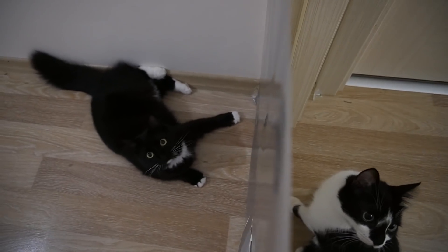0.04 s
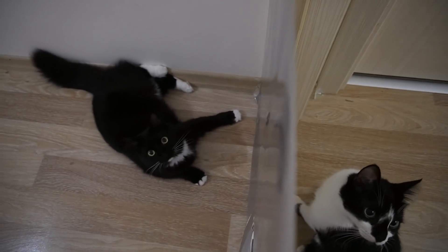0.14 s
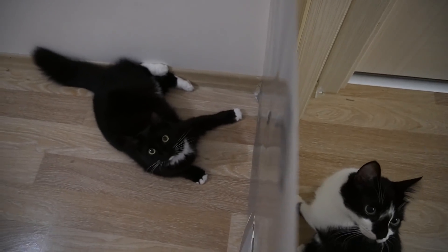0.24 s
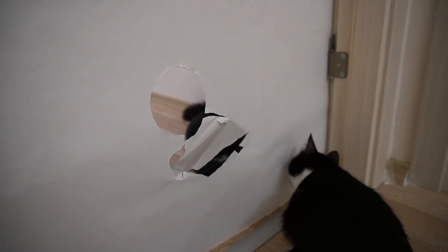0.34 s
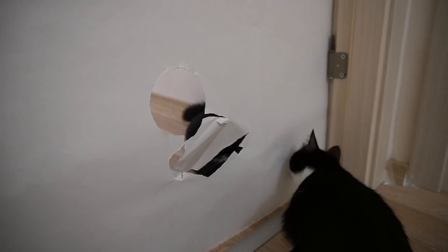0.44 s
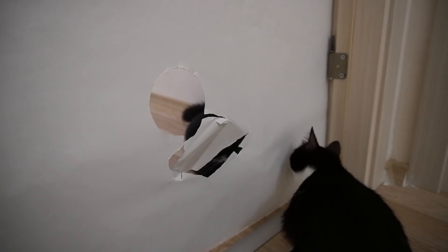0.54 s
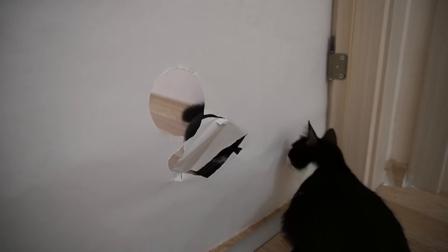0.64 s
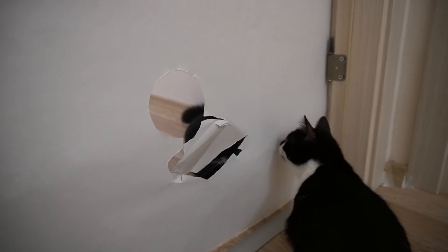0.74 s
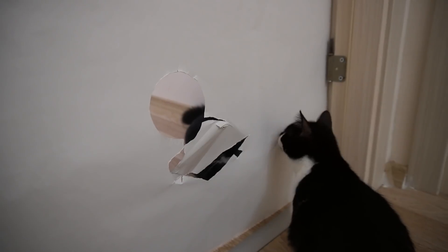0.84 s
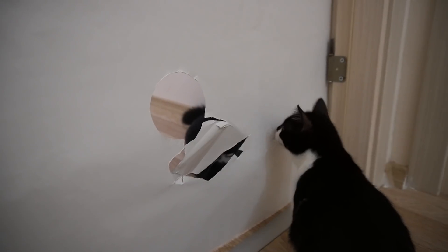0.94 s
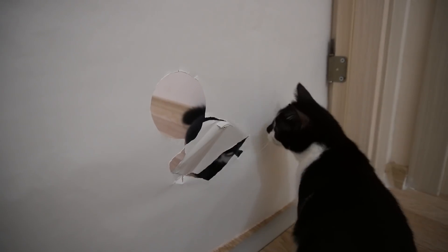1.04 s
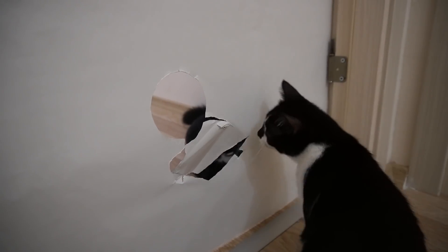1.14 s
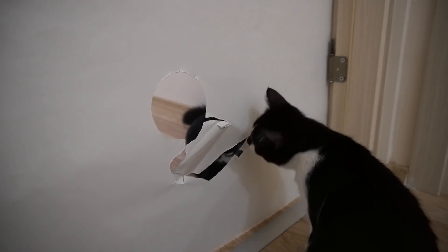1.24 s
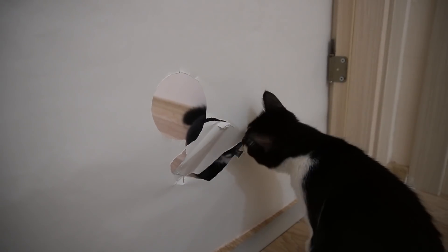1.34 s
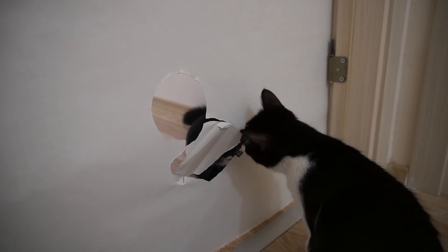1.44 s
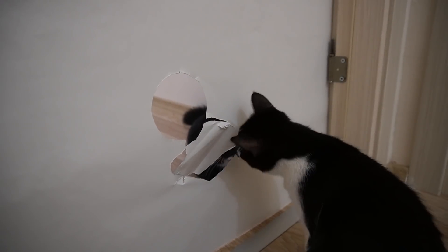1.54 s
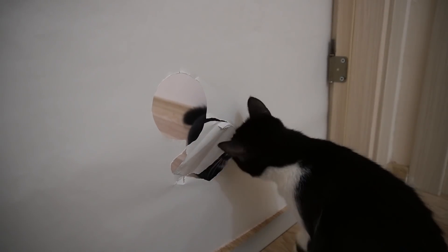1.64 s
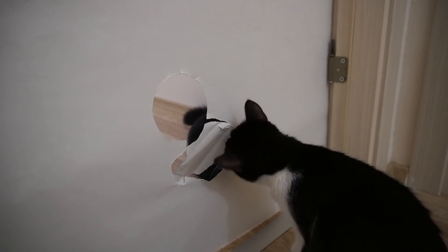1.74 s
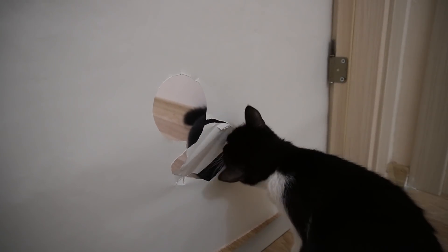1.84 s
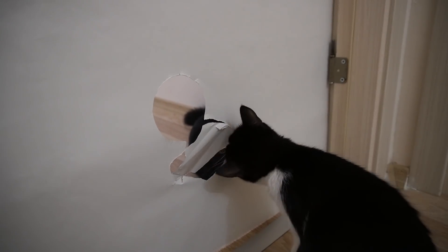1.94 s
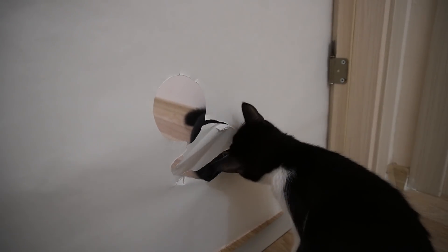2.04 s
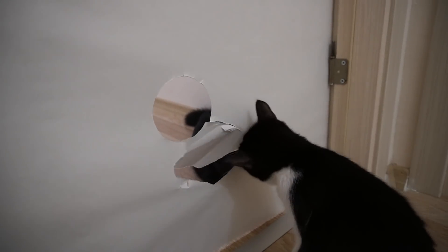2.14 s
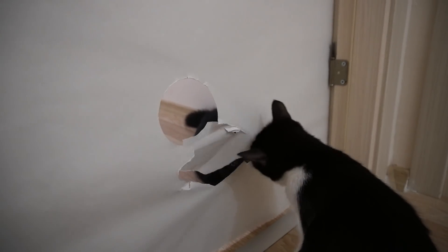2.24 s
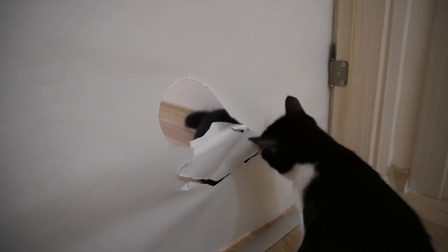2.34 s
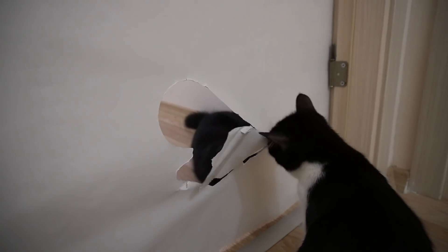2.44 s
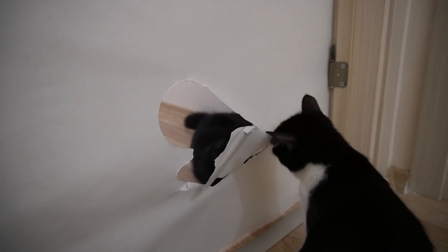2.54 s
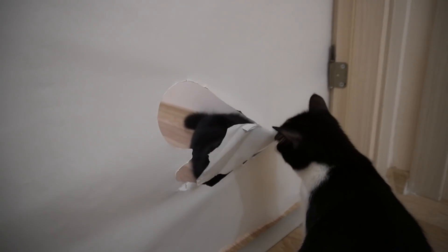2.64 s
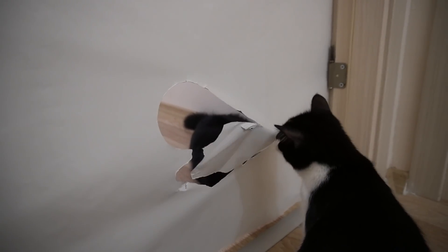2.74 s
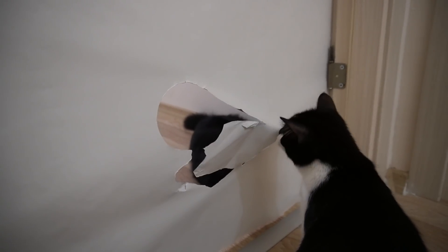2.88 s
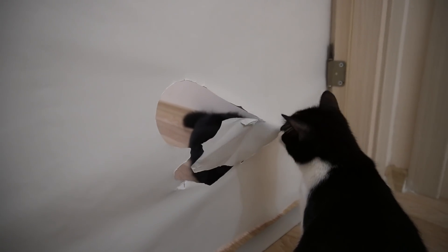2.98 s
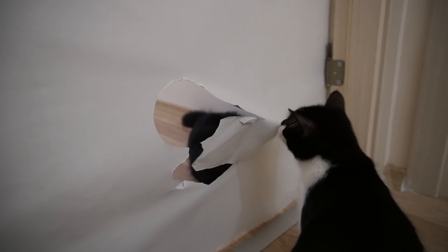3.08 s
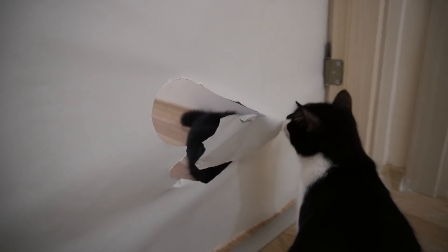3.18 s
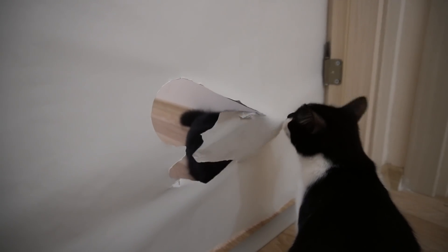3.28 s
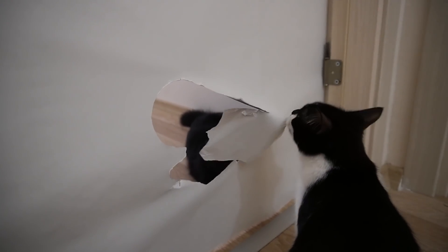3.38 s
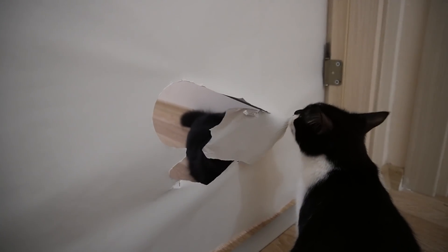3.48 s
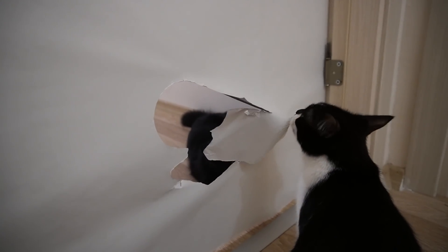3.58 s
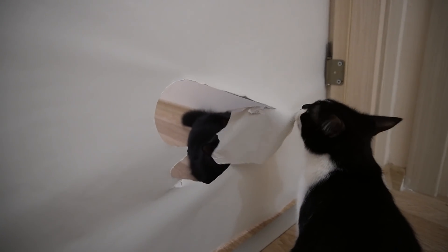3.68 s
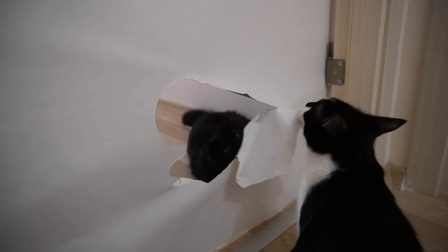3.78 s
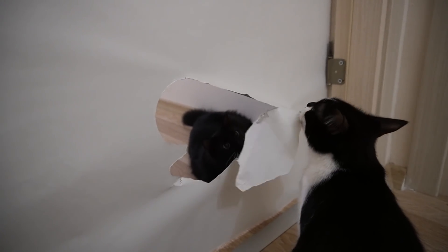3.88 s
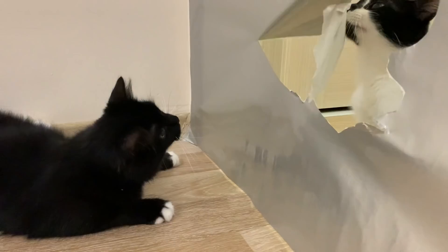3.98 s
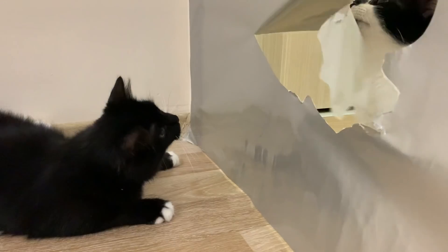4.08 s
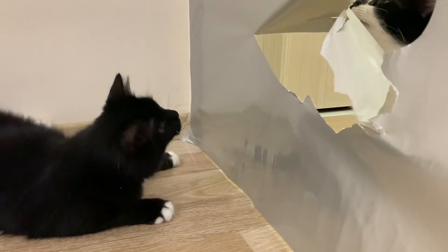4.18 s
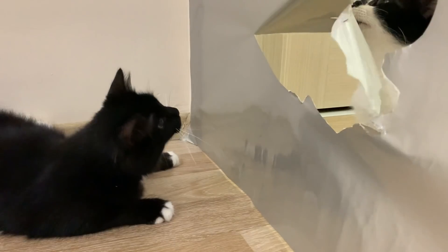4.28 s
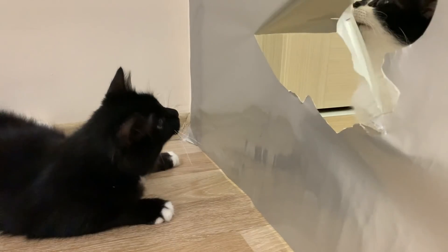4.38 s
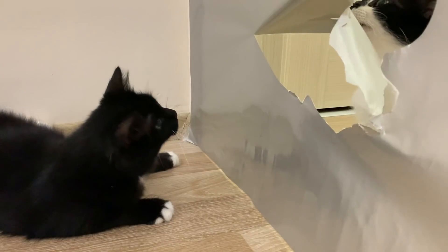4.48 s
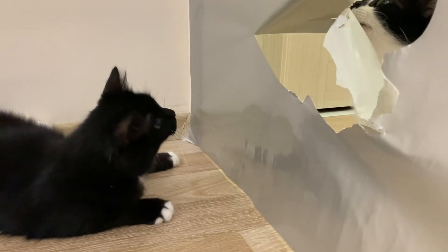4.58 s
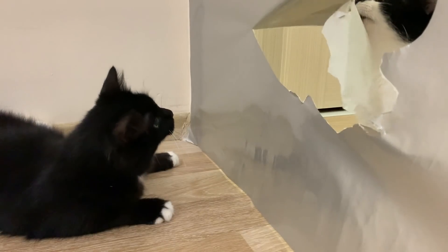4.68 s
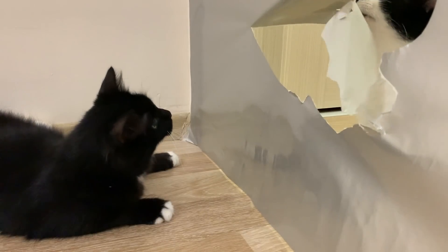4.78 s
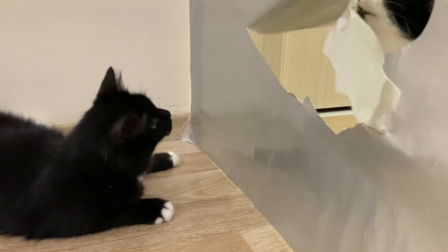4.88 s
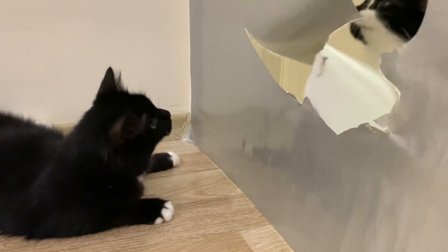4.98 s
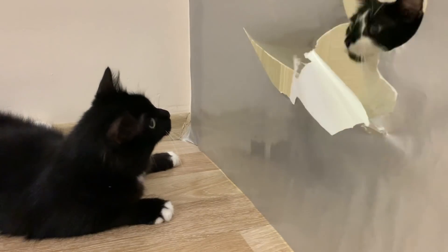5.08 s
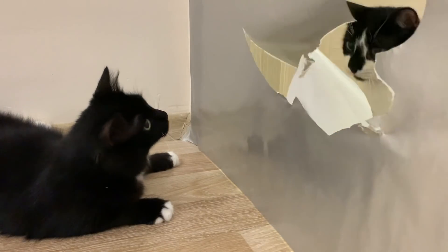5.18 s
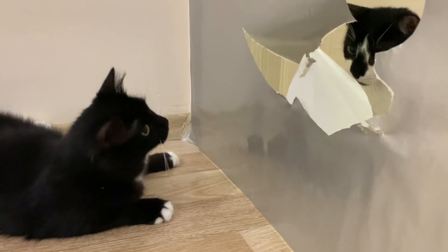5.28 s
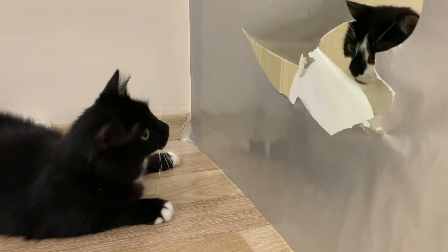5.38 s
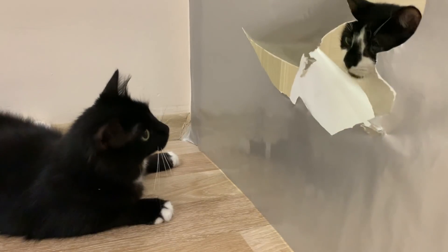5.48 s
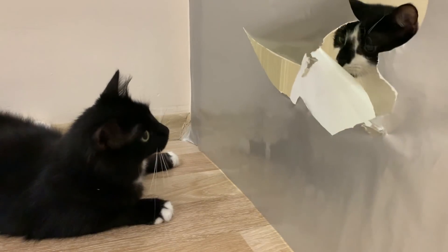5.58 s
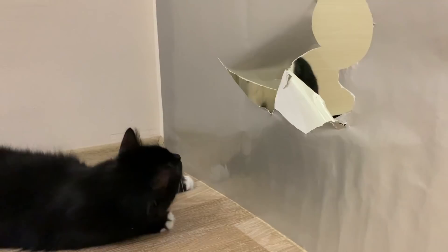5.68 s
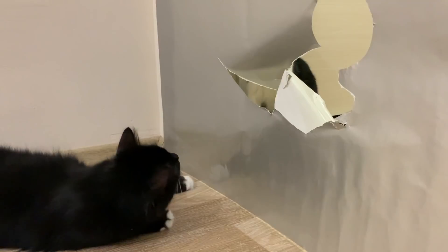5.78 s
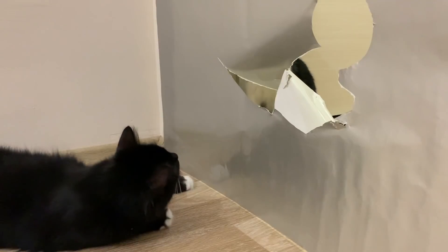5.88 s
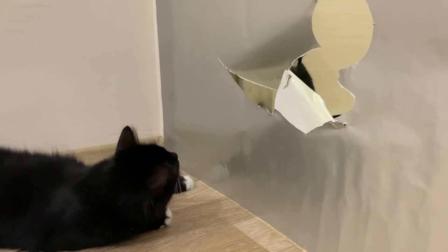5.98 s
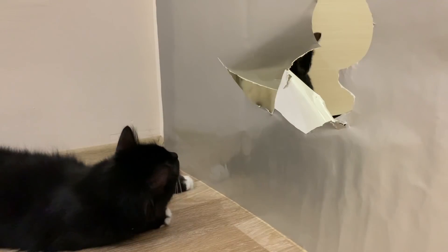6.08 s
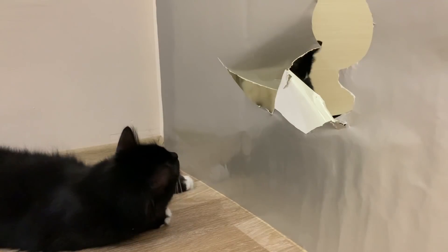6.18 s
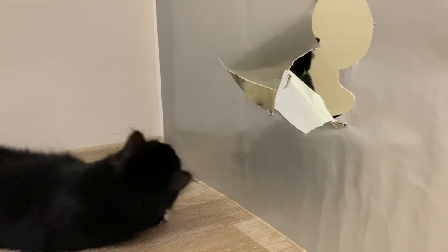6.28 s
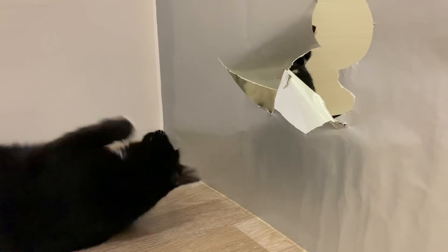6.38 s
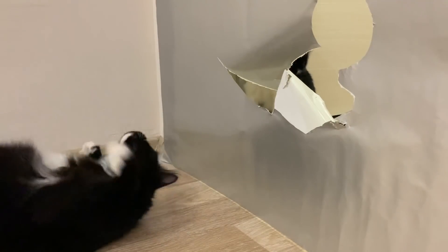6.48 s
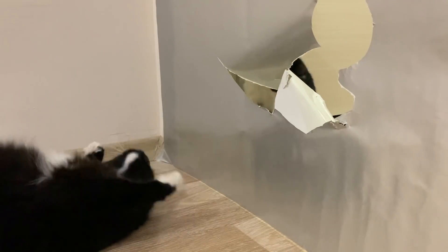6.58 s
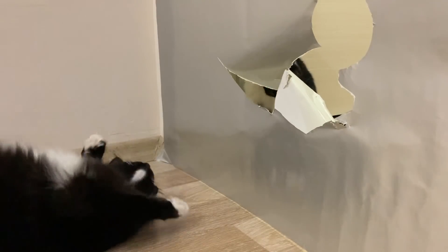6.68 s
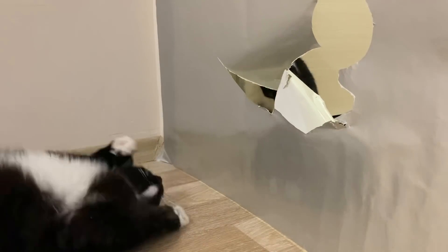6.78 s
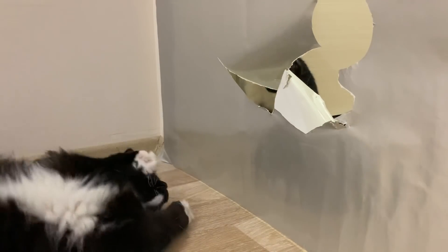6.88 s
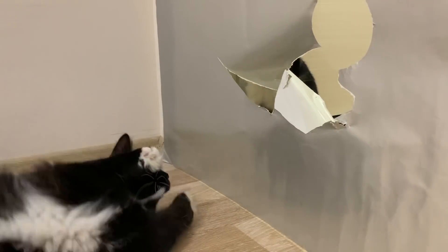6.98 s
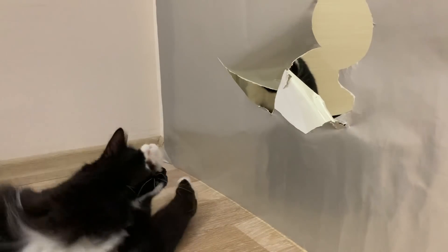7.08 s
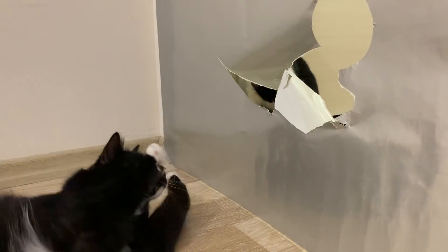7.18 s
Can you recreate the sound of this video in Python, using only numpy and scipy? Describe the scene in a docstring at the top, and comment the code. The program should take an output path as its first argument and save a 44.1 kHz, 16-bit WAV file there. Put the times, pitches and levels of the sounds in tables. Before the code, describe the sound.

A cat pushes at a taut paper sheet in a bare echoing room; it pops with a thump, then rips in sharp crackling bursts and quiets down.

```python
"""Cat tearing a paper wall

A cat nudges a taut sheet of paper in a bare, echoing room, punches through and rips off a strip.
Random clicks ring with the tone of fibres, creases or the whole sheet; swelling noise makes the pops.
Fur brushes softly before and after, as swells of fine grains in one band each.
Echoes made of dying noise carry all this; shaped noise makes the steady hiss and faint hum."""
import sys
import numpy as np
from scipy import signal
from scipy.fft import rfft, irfft, next_fast_len
from scipy.io import wavfile
from scipy.ndimage import map_coordinates

SR = 44100
rng = np.random.default_rng(int(sys.argv[2]) if len(sys.argv) > 2 else 0)


def transcribe(u):
    """Save the signal u as a 16-bit wav file named by the first command-line argument.

    u: samples, shape (n,) or (channels, n), limited to [-1, 1]; the rate is SR.
    q: integer samples, one column per channel.
    """
    v = np.clip(np.atleast_2d(u).T, -1, 1)
    q = np.round(v * 32767).astype(np.int16)
    wavfile.write(sys.argv[1], SR, q)


N = 318710  # length in samples


def amp(db):
    """Turn decibels into a gain."""
    return 10 ** (np.asarray(db) / 20)


def unit(x):
    """Scale x to an average (rms) level of 1."""
    return x / np.sqrt(np.mean(x ** 2) + 1e-20)


def along(points, hz):
    """Read a curve of (pitch_hz, value) points on a logarithmic pitch axis."""
    f, v = np.transpose(points)
    return np.interp(np.log(hz + 1), np.log(f + 1), v)


def curve(rows):
    """Turn (time_s, value) rows into one value per sample."""
    return np.interp(np.arange(N) / SR, *np.transpose(rows))


def add(track, s, x):
    """Mix x into the track at time s, in seconds."""
    part = track[..., max(round(s * SR), 0):][..., :x.shape[-1]]
    part += x[..., :part.shape[-1]]


def filtered(x, response):
    """Multiply the spectrum of x by a response that depends on frequency."""
    n = x.shape[-1]
    padded = next_fast_len(n + 8192)  # silence at the end keeps the filter from wrapping round
    spectrum = rfft(x, padded) * response(np.fft.rfftfreq(padded, 1 / SR))
    return irfft(spectrum, padded)[..., :n]


def bump(hz, centre, width):
    """A resonance curve of height 1."""
    return 1 / (1 + (2 * (hz - centre) / width) ** 2)


def ring(spectrum, modes=(), size=8192):
    """How a material answers one click: this spectrum and these resonances, with energy 1."""
    hz = np.fft.rfftfreq(size, 1 / SR)
    level_db = along(spectrum, hz) + sum(lift_db * bump(hz, f, w) for f, w, lift_db in modes)
    # folding the cepstrum makes the answer start at the click, not before it
    cepstrum = irfft(np.log(amp(level_db)))
    cepstrum[1:size // 2] *= 2
    cepstrum[size // 2 + 1:] = 0
    h = irfft(np.exp(rfft(cepstrum)))
    return h / np.linalg.norm(h)


def through(x, h):
    """Let x ring through the click answer h."""
    return signal.fftconvolve(x, h)[:N]


def stereo_noise(alike, n):
    """White noise whose left and right sides are alike by a given share at each frequency."""
    def turn(hz):
        return np.arccos(np.clip(along(alike, hz), -1, 1)) / 2

    def shares(hz):
        return np.array([np.cos(turn(hz)), np.sin(turn(hz))])

    mid, side = filtered(rng.standard_normal((2, n)), shares)
    return np.array([mid + side, mid - side])


def breaks(n, rate, spread_db):
    """Small breaks: clicks of uneven size at random moments, about rate a second."""
    x = np.zeros(n)
    count = int(n * rate / SR) + 1
    moments = rng.integers(0, n, count)
    size_db = spread_db * np.clip(rng.standard_normal(count), -2, 2)
    x[moments] = rng.choice([-1, 1], count) * amp(size_db)
    return x


def swell(n, skew):
    """A soft rise and fall; skew under 1 brings the top forward."""
    return np.sin(np.pi * np.linspace(0, 1, n) ** skew) ** 2


def swells(rows, breadth, skew, rate):
    """Soft swells of dense grains in a band around each centre."""
    out = np.zeros(N)
    for s, length, db, centre_hz in rows:
        n = int(length * SR)
        clicks = breaks(n, rate, spread_db=2)
        grains = filtered(clicks, lambda hz: bump(hz, centre_hz, breadth * centre_hz))
        add(out, s, amp(db) * swell(n, skew) * unit(grains))
    return out


def burst(shape):
    """A short puff of noise guided by this envelope, nearly even in spectrum so its echo does not ring."""
    z = rfft(shape * rng.standard_normal(len(shape)))
    even = irfft(np.exp(1j * np.angle(z)), len(shape))  # keeps the timing, levels the spectrum
    x = even * np.sqrt(shape)
    return x * np.linalg.norm(shape) / np.linalg.norm(x)


# Tone of the air hiss, only its shape counts: pitch_hz, level_db
AIR_TONE = [(12, -26.5), (20, -8), (44, -9.5), (101, -3), (127, -6.5), (146, -9.5), (228, -11.5), (277, -6),
            (310, -12.5), (472, -14.5), (698, -15.5), (1120, -21.5), (2260, -24), (14700, -33.5),
            (16000, -37)]
# Loudness of the air hiss over time: time_s, level_db
AIR_LOUDNESS = [(0, -58.5), (.3, -57.5), (.4, -56.5), (1.7, -55.5), (5.4, -55.5), (7.23, -55)]
# How alike the hiss is left and right: pitch_hz, likeness (1 = the same)
AIR_LIKENESS = [(60, 1), (180, 0.79), (550, -0.177), (1650, -0.126), (4970, -0.003), (15000, 0.35)]
# The two low hums: pitch_hz, width_hz, level_db before the hum's rise and fall
HUM_BANDS = [(98.14, 10.7, -65.5), (281, 35, -73)]
# Rise and fall of the hum: time_s, gain_db
HUM_GAIN = [(0, -3.5), (.3, -12.5), (.4, 2), (6.8, 1.5), (7.1, 7)]


def background():
    """Steady room air and microphone hiss from shaped noise, with a fuzzy hum from narrow noise bands."""
    air = unit(filtered(stereo_noise(AIR_LIKENESS, N), lambda hz: amp(along(AIR_TONE, hz))))
    hum = np.zeros(N)
    for centre, width, db in HUM_BANDS:
        band = filtered(rng.standard_normal(N), lambda hz: bump(hz, centre, width))
        hum += amp(db) * unit(band)
    return amp(curve(AIR_LOUDNESS)) * air + amp(curve(HUM_GAIN)) * hum


# Fur brushing paper and floor: start_s, length_s, level_db before swell and room, pitch_hz of the band
FUR_BRUSHES = [(1.31, 0.101, -67, 9500), (1.82, 0.085, -54.5, 9500), (1.88, 0.1982, -58.5, 6540),
               (2.115, 0.083, -42.5, 9500), (5.554, .17, -63.5, 3000), (5.58, .15, -64.5, 645.2),
               (5.764, 0.032, -61.5, 3000), (6.297, 0.075, -62, 642), (6.33, .3, -66, 2223),
               (6.549, 0.295, -65, 9000), (6.905, .055, -59.5, 5100), (7.129, 0.137, -63.5, 7900)]


def fur():
    """Many hairs slide over a surface: dense soft grains that swell and fade."""
    return swells(FUR_BRUSHES, breadth=1.0, skew=0.45, rate=1100)


# The sheet bending under a paw without tearing: start_s, length_s, level_db before swell and room
PAW_FLEXES = [(1.905, 0.1017, -51.5), (1.98, 0.1514, -40.5), (2.113, 0.0834, -37.5), (2.763, .08, -43.5),
              (4.008, 0.1212, -43), (4.109, .2, -47), (4.871, .17, -44), (5.021, 0.293, -54)]
# Tone of the whole sheet, only its shape counts: pitch_hz, level_db
SHEET_TONE = [(22, -37.5), (45, -2.5), (70, -4.5), (150, -6), (250, -6), (400, -3.5), (600, -6.5),
              (800, -7), (1050, -9), (1400, -8), (2200, -10.5), (4000, -20.5), (16000, -69)]
# Resonances of the sheet: pitch_hz, width_hz, lift_db
SHEET_RESONANCES = [(74.9, 5.7, 8.5), (146.17, 11.2, 9.5), (294.7, 16.6, 6.5), (431.3, 29, 2),
                    (795, 72, 2.5)]
# Tone of fine fibres, only its shape counts: pitch_hz, level_db
FIBRE_TONE = [(300, -21), (2000, 0), (4500, -1.5), (8000, -0.5), (13000, -1.5), (16000, -7.5)]


def flexes(fibre_db=-14):
    """Small buckles rumble through the bending sheet; fibres creak, fibre_db against its body."""
    buckles = np.zeros(N)
    for s, length, db in PAW_FLEXES:
        n = int(length * SR)
        clicks = unit(breaks(n, rate=700, spread_db=5))
        add(buckles, s, amp(db) * swell(n, skew=0.529) * clicks)
    body = ring(SHEET_TONE, SHEET_RESONANCES)
    return through(buckles, body + amp(fibre_db) * ring(FIBRE_TONE))


# Pulls that tear the paper: start_s, end_s, force_db,
# fibre_db (fine fibres over the force), sheet_db (sheet over the force)
TEARING_PULLS = [(2.281, 2.425, -28.5, 3.5, 1), (2.431, 2.566, -33, 0.5, -4.5),
                 (2.571, 2.718, -27, -2, -7.5), (2.849, 2.893, -26, 2.5, -6.5),
                 (3.085, 3.159, -27.5, 1, -3), (3.32, 3.353, -32.5, -2.5, -3.5),
                 (3.358, 3.408, -27.5, 1.5, -2), (3.645, 3.757, -25, 0, -3), (4.119, 4.135, -37.5, -1.5, 2),
                 (4.604, 4.68, -30.5, 0.5, -1.5), (4.691, 4.785, -42.5, 4, 4.5)]
SAG_DB_PER_S = 6  # a pull eases off at this speed
CATCH_S, CATCH_SCATTER = .017, .35  # mean time between creases met, and its scatter (share of that time)
# each crease met: snap over the force, spray over the fibres, scatter of its size
CATCH_DB, CATCH_SPRAY_DB, CATCH_SPREAD_DB = 6.5, -1.5, 2


def catches():
    """A running tear meets creases at uneven intervals; a harder pull snaps them louder. Rows as PAPER_SNAPS."""
    rows = []
    for start, end, force_db, fibre_db, _ in TEARING_PULLS:
        scatter = np.clip(rng.standard_normal(size=(40, 2)), -2, 2)
        for k, (shift, size) in enumerate(scatter):
            age = CATCH_S * max(k + .5 + CATCH_SCATTER * shift, 0)  # seconds since the pull began
            db = force_db - SAG_DB_PER_S * age + CATCH_SPREAD_DB * size
            if age < end - start:
                rows.append((start + age, db + CATCH_DB, db + fibre_db + CATCH_SPRAY_DB))
    return rows


# Single snaps, flap slaps and faint ticks, loud to very soft, levels before the gains in snaps():
# start_s, crease_db, fibre_db
PAPER_SNAPS = [(1.983, -37, -39), (2.028, -43, -43), (2.0673, -56.5, -39.5), (2.0799, -40, -44.5),
               (2.2823, -24.5, -16), (2.3596, -39.5, -15), (2.4162, -20, -32), (2.473, -16, -19),
               (2.5185, -20.5, -24), (2.597, -17.5, -27.5), (2.6136, -16.5, -20), (2.8185, -17, -30),
               (2.824, -20.5, -19), (2.8507, -18.5, -26.5), (2.8676, -18, -33.5), (2.8829, -18.5, -25),
               (3.068, -21, -27), (3.0819, -18.5, -21.5), (3.0924, -16, -25.5), (3.1158, -19, -23),
               (3.3178, -20, -21), (3.4077, -23, -36.5), (3.6288, -25.5, -38.5), (3.6511, -16.5, -28),
               (4.015, -27.5, -27.5), (4.1155, -19.5, -27), (4.583, -40.5, -42), (4.67, -26, -19.5),
               (4.704, -35, -20), (4.79, -35.5, -29), (4.843, -32, -36), (4.9666, -34, -52),
               (5.0265, -35.5, -51.5), (5.1958, -46.5, -58.5), (5.775, -58, -62)]
# Tone of a buckling crease, only its shape counts: pitch_hz, level_db
CREASE_TONE = [(200, -27.5), (900, -10.5), (1600, -1), (2700, 1), (3800, -3), (5200, -7), (7000, -13),
               (16000, -36)]
# Resonance of a buckling crease: pitch_hz, width_hz, lift_db
CREASE_RESONANCES = [(2570, 1540, 1.5)]


def snaps(crease_db=21.0, spray_db=4, spray_t60=.02, body_db=11):
    """Paper snaps, slaps or ticks in one sharp pulse, with a short spray of fibre noise right after it."""
    pulses, spray = np.zeros((2, N))
    t = np.arange(SR // 50) / SR
    for s, db, fibre_db in PAPER_SNAPS + catches():
        add(pulses, s, np.array([amp(db) * rng.choice([-1, 1])]))
        add(spray, s, burst(amp(fibre_db + spray_db - 60 * t / spray_t60)))
    crease = amp(crease_db) * ring(CREASE_TONE, CREASE_RESONANCES)
    body = amp(body_db) * ring(SHEET_TONE, SHEET_RESONANCES)
    return through(pulses, crease + body) + through(spray, ring(FIBRE_TONE))


# The slack sheet swaying: start_s, length_s, level_db before swell and room, pitch_hz of the band
SHEET_SWAYS = [(2.118, 0.071, -39.5, 110.3), (2.185, .1, -30, 135), (4.015, .1, -43.5, 179.2),
               (4.11, 0.44, -56, 130), (4.6, 0.2006, -39, 105.3), (4.85, .16, -40.5, 110.7),
               (5.02, 0.346, -57.5, 108.5)]


def sways():
    """The slack sheet sways: dense grains in a low band that swell and fade."""
    return swells(SHEET_SWAYS, breadth=0.98, skew=0.537, rate=1500)


# The whole sheet jerking: start_s, push_db, pitch_hz of the swing,
# drum_db and crack_db (both before sheet, fibres and room)
SHEET_POPS = [(2.182, -13.5, 127, -19, -16), (4.824, -26, 54.03, -33.5, -51.5)]


def pops(drum_t60=0.329, crack_t60=0.0153, lead=0.0038, soft_hz=4500):
    """The taut sheet lets go: a quickly swelling crack, then a dull drumming."""
    drum, crack = np.zeros((2, N))
    t = np.arange(SR // 2) / SR
    for s, _, _, drum_db, crack_db in SHEET_POPS:
        add(drum, s, amp(drum_db - 60 * t / drum_t60) * rng.standard_normal(len(t)))
        # the crack peaks at s, after rising for lead seconds
        add(crack, s - lead, burst(amp(crack_db - 60 * np.abs(t - lead) / crack_t60)))
    drumming = through(drum, ring(SHEET_TONE, SHEET_RESONANCES))
    dull = filtered(drumming, lambda hz: 1 / (1 + 1j * hz / soft_hz))
    return dull + through(crack, ring(FIBRE_TONE))


def pushes(cycles=1.385):
    """The jerking sheet swings a little over once and shoves the air right in front of it."""
    out = np.zeros(N)
    for s, db, swing_hz, _, _ in SHEET_POPS:
        t = np.arange(int(cycles / swing_hz * SR)) / SR
        swing = np.sin(2 * np.pi * swing_hz * t)
        add(out, s, amp(db) * swell(len(t), skew=0.57) * swing)
    return out


def slips(n, rate, depth_db):
    """The tear sticks and runs: a smooth random gain with rate knots a second."""
    knots = np.clip(rng.standard_normal(int(n * rate / SR) + 4), -2, 2)
    return amp(depth_db * map_coordinates(knots, [np.arange(n) * rate / SR]))


# Tone of coarse fibre bundles, only its shape counts: pitch_hz, level_db
BUNDLE_TONE = [(100, -28), (700, -16), (1100, -8), (1600, 1.5), (2100, -8), (2700, 2.5), (3400, 1),
               (4600, -12.5), (8000, -16.5), (16000, -44)]
ATTACK_S, RELEASE_T60 = 0.00383, .1  # a pull bites this fast; it dies by 60 dB in this many seconds
GRIP_S, GRIP_DB = .022, -9.5  # first fibres part this long before the tear runs, this much softer


def rips():
    """Each pull breaks coarse bundles and fine fibres in clumps; the same clumps shake the sheet."""
    coarse, fine, shake = np.zeros((3, N))
    for start, end, force_db, fibre_db, sheet_db in TEARING_PULLS:
        first = start - GRIP_S
        n = round((end - first + RELEASE_T60) * SR)
        t = first + np.arange(n) / SR
        bite_db = GRIP_DB * np.clip((start - t) / ATTACK_S, 0, 1)
        sag_db = -SAG_DB_PER_S * (t - start)
        release_db = -60 * np.maximum(t - end, 0) / RELEASE_T60
        fade_in = np.minimum((t - first) / ATTACK_S, 1)
        effort = fade_in * amp(force_db + bite_db + sag_db + release_db)
        run = slips(n, rate=259, depth_db=4.5) * slips(n, rate=70.1, depth_db=2.5)
        add(coarse, first, effort * unit(run * breaks(n, rate=650, spread_db=4.5)))
        add(fine, first, effort * amp(fibre_db) * unit(run * breaks(n, rate=3500, spread_db=2.5)))
        add(shake, first, effort * amp(sheet_db) * unit(run * breaks(n, rate=1500, spread_db=3.0)))
    bundles = amp(-5.0) * through(coarse, ring(BUNDLE_TONE))
    fibres = through(fine, ring(FIBRE_TONE))
    sheet = amp(-1.0) * through(shake, ring(SHEET_TONE, SHEET_RESONANCES))
    return bundles + fibres + sheet


def random_lag(spread=0.9):
    """A small random left-right lag, drawn anew for each stretch, which widens the treble."""
    lag = spread * rng.choice([-1, 1]) / 2
    return np.sinc(np.arange(-6, 7) + np.array([[lag], [-lag]]))  # a delay of part of a sample


# How alike the echo is left and right: pitch_hz, likeness (1 = the same)
ECHO_LIKENESS = [(100, 1), (300, 1), (700, 0.834), (2000, 0.543), (4000, 0.289), (12000, 0.093)]


def echo(t60, delay, seconds):
    """A stereo echo of energy 1 per channel on average; each frequency dies at its own speed."""
    n = int(seconds * SR)
    hz, t, z = signal.stft(stereo_noise(ECHO_LIKENESS, n), SR, nperseg=256)
    decay = amp(-60 * t / along(t60, hz)[:, None])
    tail = signal.istft(z * decay, SR, nperseg=256)[1][:, :n]
    tail = np.pad(tail, ((0, 0), (int(delay * SR), 0)))
    return tail / np.sqrt(np.sum(tail ** 2) / 2)


def bounced(x, response, count):
    """Give each of count stretches of x a new stereo response, because the tear keeps moving."""
    out = np.zeros((2, N))
    for part in np.array_split(np.arange(N), count):
        if np.max(np.abs(x[part])) > 1e-5:  # skip silence
            add(out, part[0] / SR, signal.fftconvolve(x[None, part], response(), axes=1))
    return out


# Strength of the straight path and nearby scatter: time_s, gain_db
CLOSE_GAIN = [(3.9, -4), (4.0, -13), (4.4, -14), (4.6, -3.5), (4.95, -3.5)]
# Time in which the wall echo dies by 60 dB: pitch_hz, time_s
WALL_DECAY = [(60, 0.977), (160, 1), (420, 0.522), (1100, 0.695), (2900, 0.671), (7700, 0.643),
              (15000, 0.3595)]


def room(x, near_db=-3.0, near_t60=0.0144, tail_db=-3.0):
    """Straight path, scatter off the sheet and floor close by, and the bare walls."""
    close = x * amp(curve(CLOSE_GAIN))
    straight = bounced(close, random_lag, count=360)
    near = bounced(close, lambda: echo([(1000, near_t60)], delay=.0005, seconds=1 / 30), count=360)
    walls = bounced(x, lambda: echo(WALL_DECAY, delay=.002, seconds=3 / 4), count=80)
    return straight + amp(near_db) * near + amp(tail_db) * walls


def scene():
    """Paper and fur in the room, with the air pushes and the background."""
    paper = room(rips() + snaps() + pops() + flexes() + sways() + fur())

    # the tear lies a little to the right, which only the treble shows: pitch_hz, right over left in dB
    def lean(hz):
        return along([(700, 0), (1300, 1.14), (2400, 2.0), (4400, -0.34), (12000, 1.33)], hz)

    placed = filtered(paper, lambda hz: amp(np.array([-lean(hz), lean(hz)]) / 2))
    return placed + pushes() + background()


def record(dry, top_hz=16200):
    """Keep nothing at or above the band limit."""
    return filtered(dry, lambda hz: hz < top_hz)


dry = scene()
out = record(dry)
transcribe(out)
```